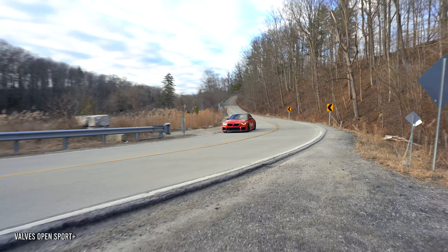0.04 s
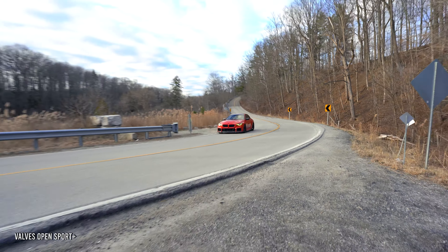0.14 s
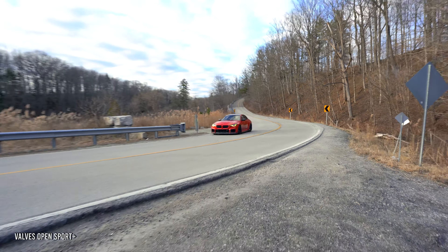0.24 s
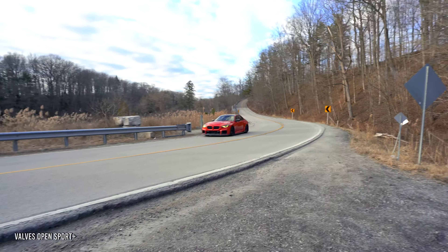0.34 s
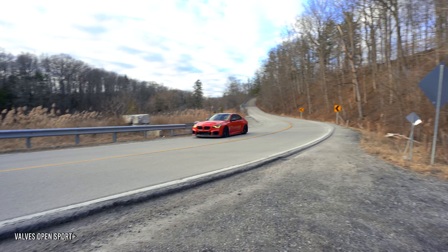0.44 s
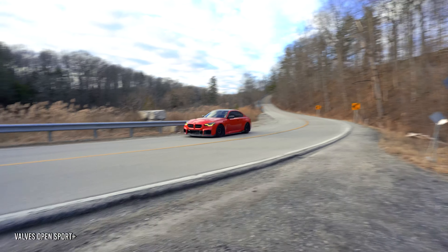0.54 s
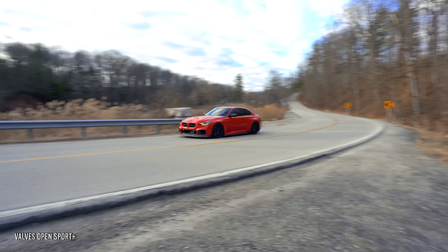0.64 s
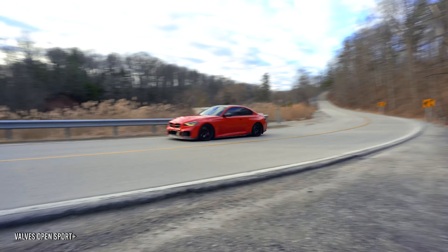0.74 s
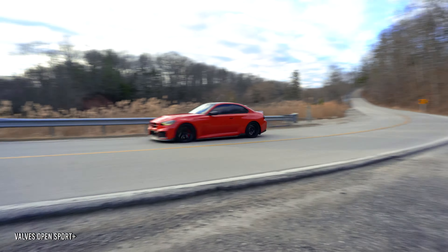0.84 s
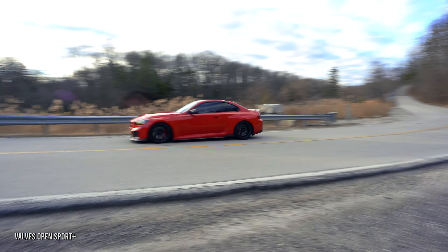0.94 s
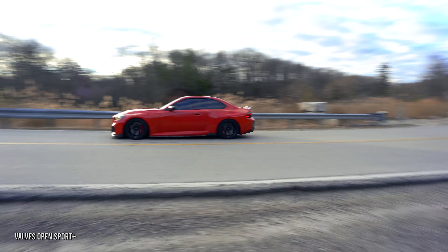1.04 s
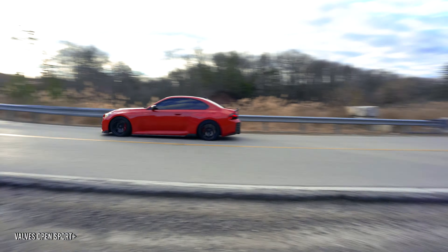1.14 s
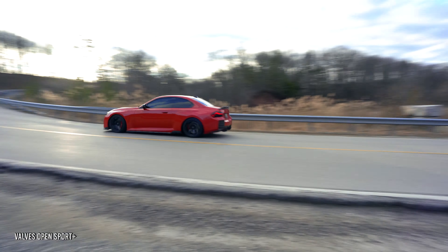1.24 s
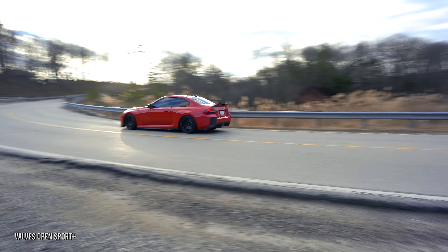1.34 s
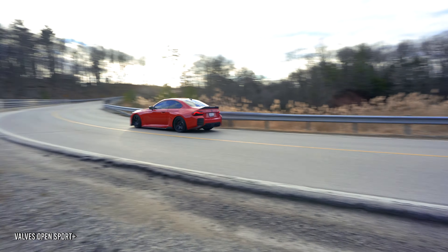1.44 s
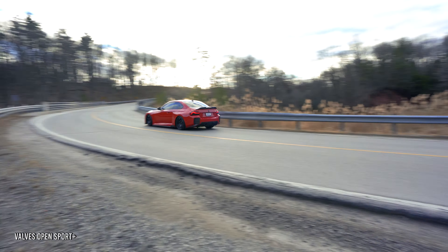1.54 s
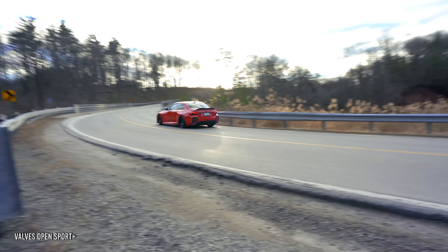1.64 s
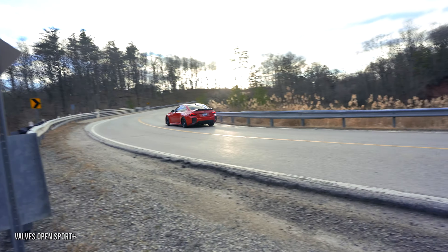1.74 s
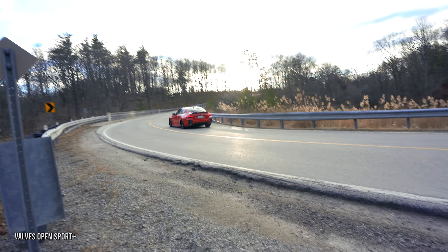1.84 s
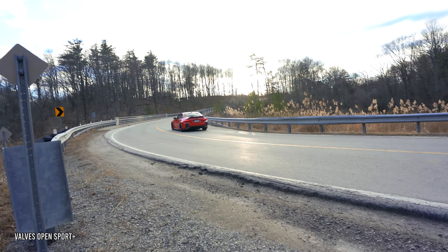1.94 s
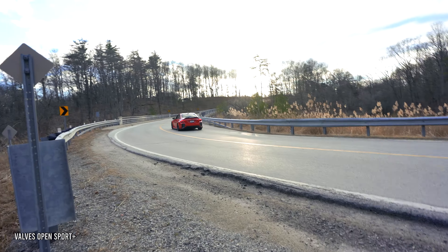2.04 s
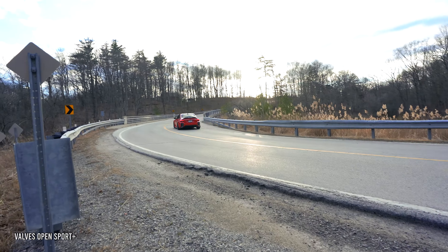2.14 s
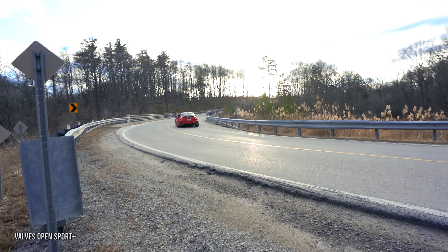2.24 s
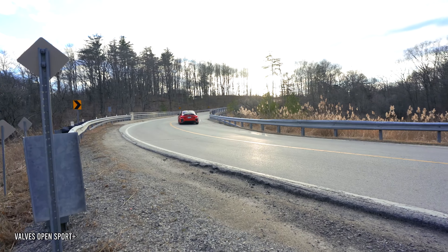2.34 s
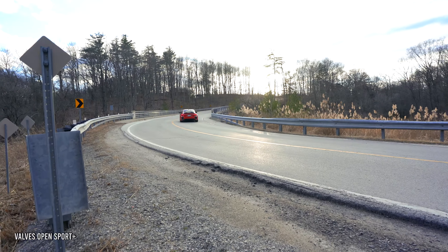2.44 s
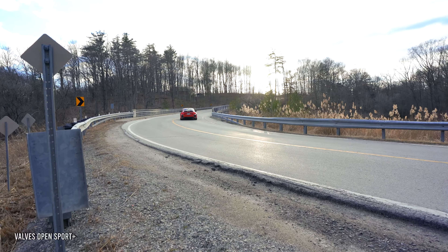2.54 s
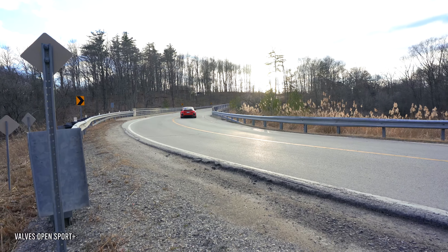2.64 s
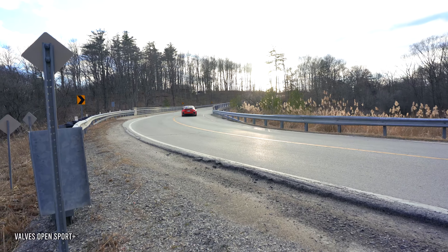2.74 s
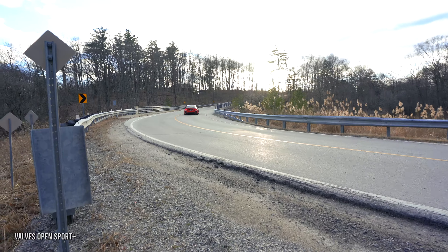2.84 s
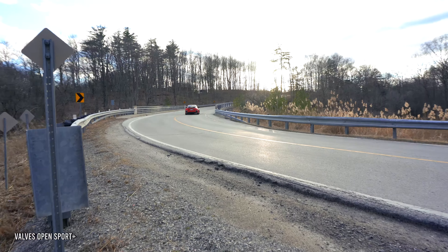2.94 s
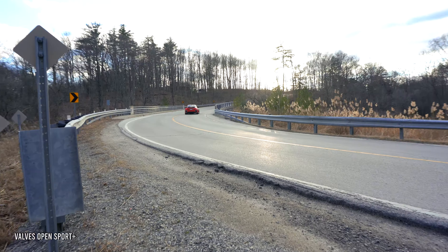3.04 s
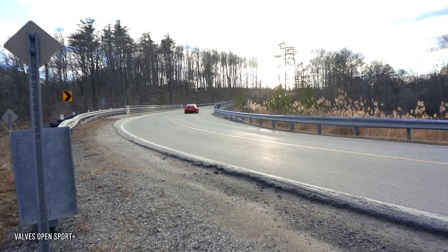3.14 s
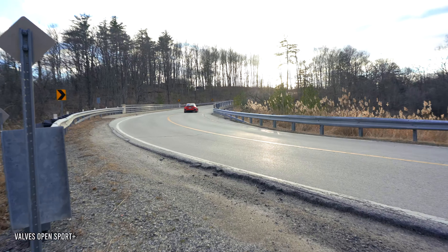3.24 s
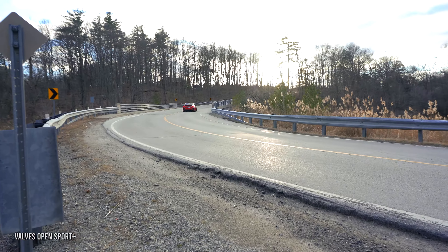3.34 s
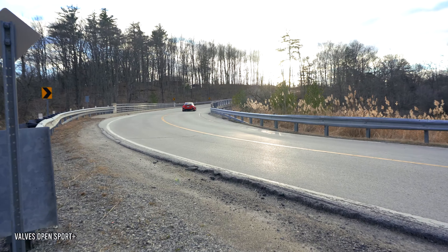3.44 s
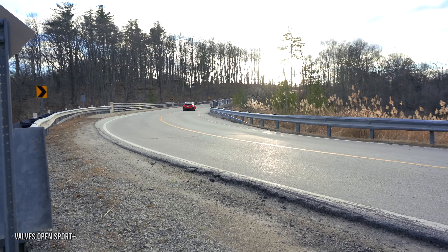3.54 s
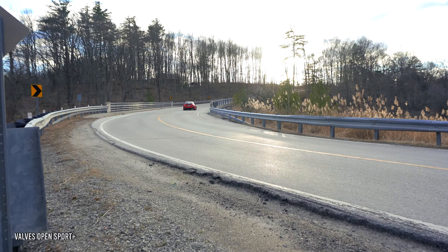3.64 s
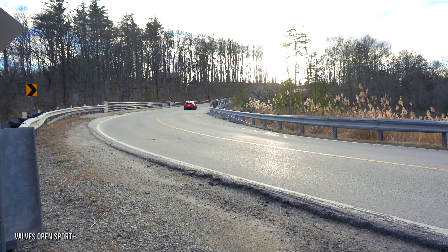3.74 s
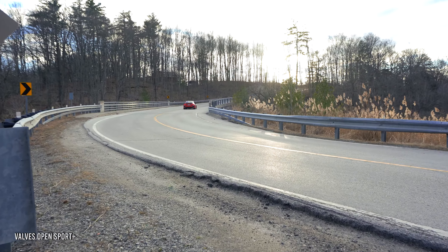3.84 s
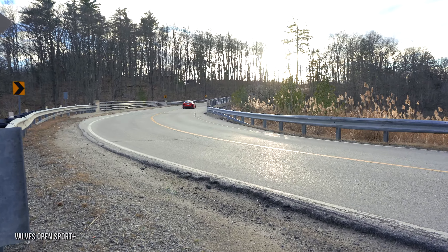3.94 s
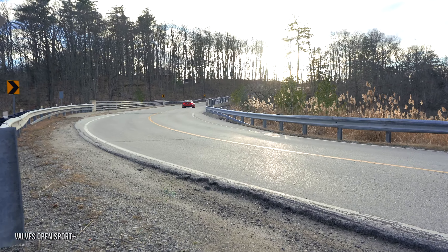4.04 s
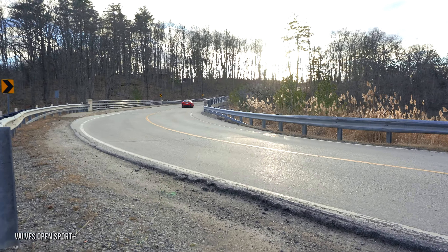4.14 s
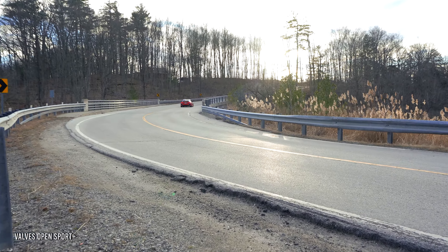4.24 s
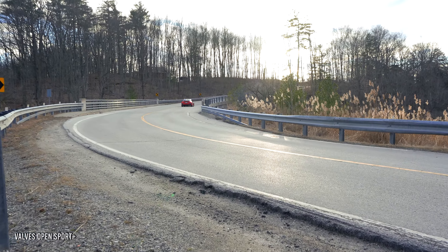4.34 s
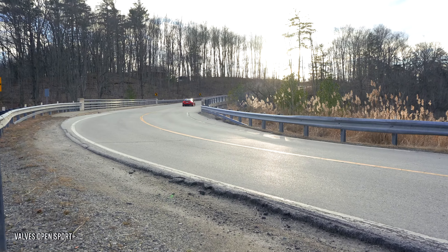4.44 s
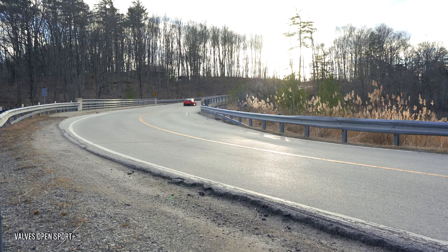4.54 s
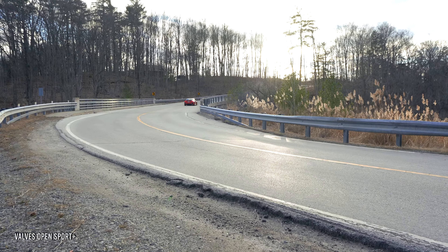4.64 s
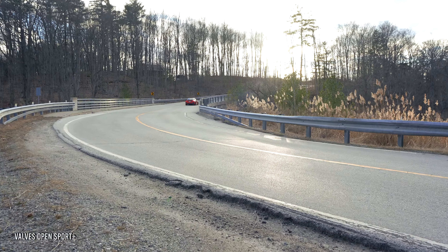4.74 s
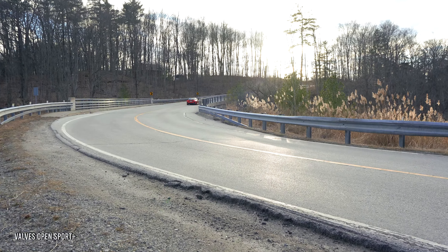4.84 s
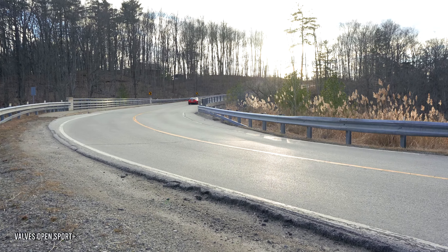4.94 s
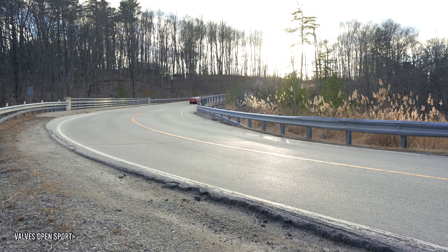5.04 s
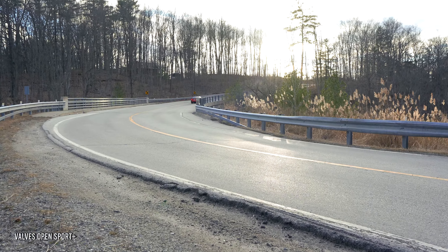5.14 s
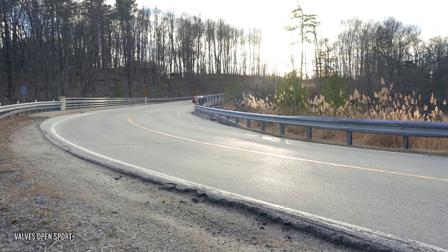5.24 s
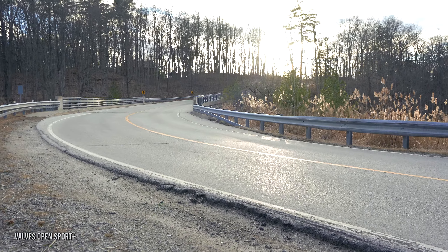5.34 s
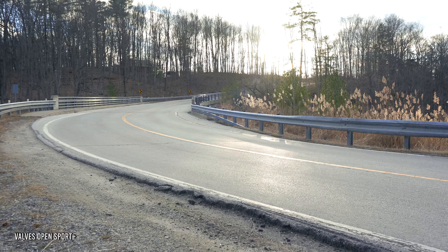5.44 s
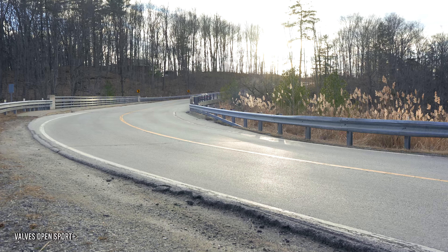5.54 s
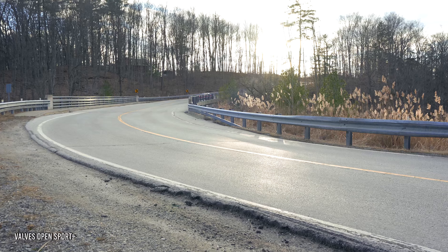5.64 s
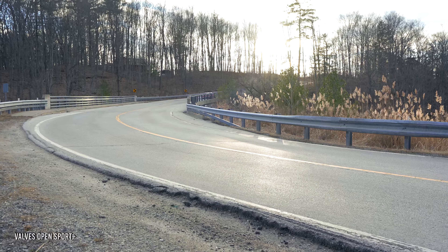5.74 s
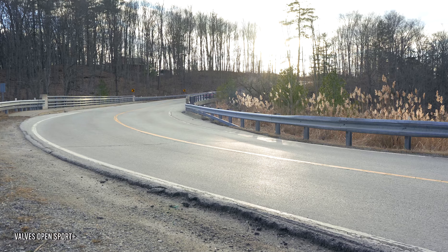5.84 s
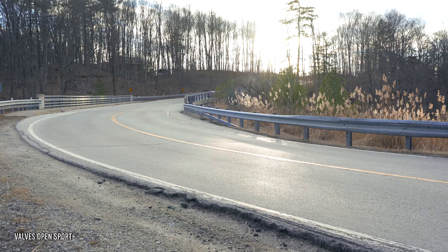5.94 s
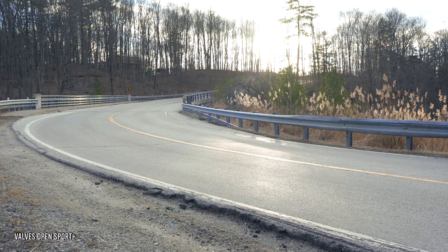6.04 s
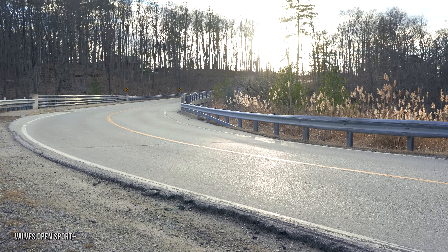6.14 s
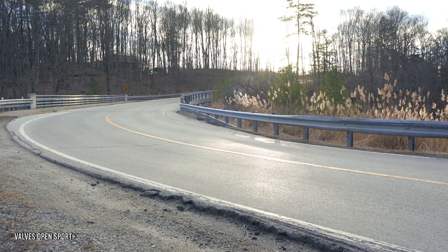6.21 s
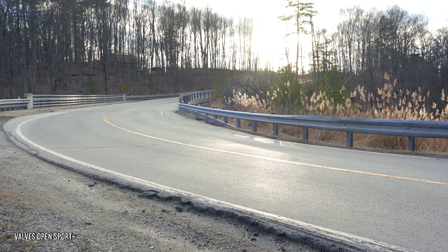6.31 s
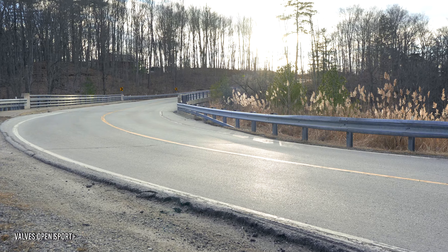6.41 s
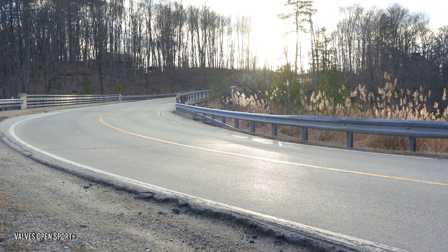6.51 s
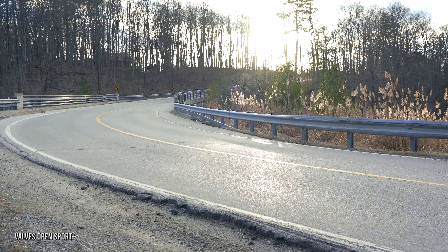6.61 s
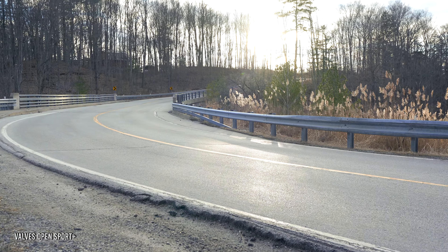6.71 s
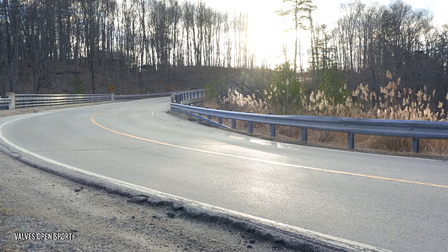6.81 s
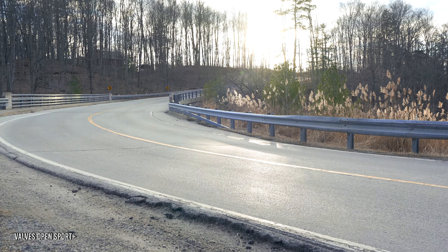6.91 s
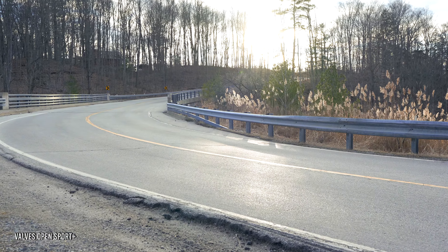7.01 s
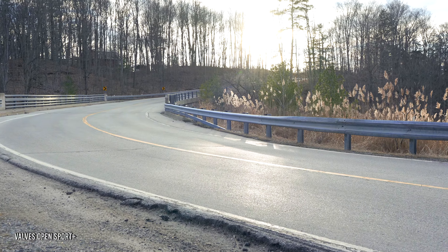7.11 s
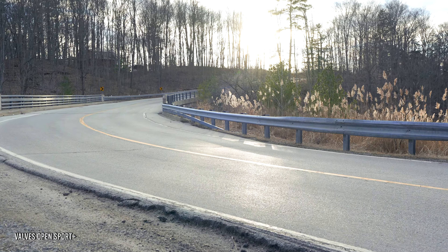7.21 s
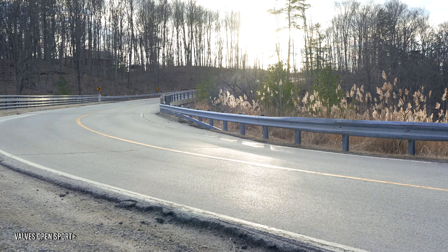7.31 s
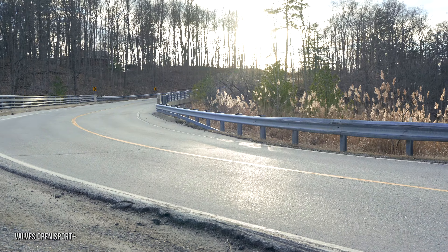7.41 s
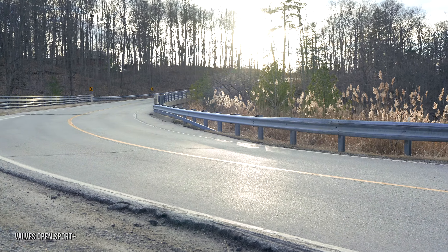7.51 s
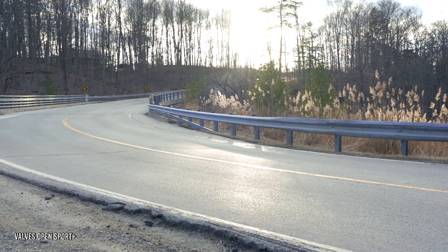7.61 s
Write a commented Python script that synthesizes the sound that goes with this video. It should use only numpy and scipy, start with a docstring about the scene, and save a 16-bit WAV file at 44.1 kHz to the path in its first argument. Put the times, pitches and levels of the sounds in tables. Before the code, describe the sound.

Loud sports car passes on a country road, falling in pitch, accelerating away with rasp, then lift-off pops and gunshot-like bangs echo off trees.

```python
"""A six-cylinder sports car sweeps past on a country road, shifts up and pulls away, exhaust valves open.
Its note is a stack of harmonics of the firing rate; filtered pulses and noise add the rasp of the gas.
When the driver lifts, unburnt fuel burbles (uneven pulses) and bangs (shock fronts with a ringing pipe).
Far off the car pulls once more and lifts again. Shaped noise makes tyre roar, wind and low puffs;
a sine of wavering pitch is the turbo's whistle, and a wooded slope answers as a decaying noise echo."""
import sys
import numpy as np
from scipy import signal
from scipy.fft import rfft, irfft, next_fast_len
from scipy.io import wavfile
from scipy.ndimage import uniform_filter1d, map_coordinates

SR = 44100
rng = np.random.default_rng(int(sys.argv[2]) if len(sys.argv) > 2 else 0)


def output_pcm(signal):
    """Save a mono or channel-first signal as 16-bit PCM at the path in sys.argv[1].

    Samples are clipped to [-1, 1] before scaling.
    """
    pcm = np.clip(np.atleast_2d(signal).T, -1, 1) * 32767
    wavfile.write(sys.argv[1], SR, np.round(pcm).astype(np.int16))


N = 338247

# the driver lifts off the throttle: start t/s, end t/s, flare just before/dB (below 0: a dip), note drop/dB,
# rasp drop/dB (below 0: a rise), burble level/dB, puff level/dB
LIFTS = [(1.55, 1.639, -1.5, 9.5, -1.5, -19, -15.5), (3.888, 5.47, 2.5, 12, 12, -19, -25),
         (7.107, 7.9, 10, 24.5, 13, -29, -31)]
# colour of low, buffeting air: f/Hz, relative level/dB
BUFFET = [(12, -6.5), (30, -2), (70, -1.5), (150, -4), (400, -16.5), (1500, -87)]
# the pass: moment of closest approach, distance then, speed
PASS_S, CLOSEST_M, SPEED_M_PER_S = 0.76, 15.6, 15.66
BEND_M = 57.6  # beyond this distance the car is round the bend and sounds duller


def amp(db):
    """Decibels to a plain factor."""
    return 10 ** (np.asarray(db) / 20)


def unit(x):
    """x scaled to an rms of 1."""
    return x / np.sqrt(np.mean(x ** 2) + 1e-20)


def along(points, hz):
    """Values read between (frequency, value) points on a log frequency axis."""
    f, v = np.transpose(points)
    return np.interp(np.log(hz + 1), np.log(f + 1), v)


def curve(points):
    """One value per sample, in straight lines between (time, value) points."""
    s, v = np.transpose(points)
    return np.interp(np.arange(N) / SR, s, v)


def wobble(rate):
    """A smooth random curve with this many random knots a second."""
    knots = rng.standard_normal(int(N * rate / SR) + 4)
    return map_coordinates(knots, [np.arange(N) * rate / SR])


def step(at_s, width_s):
    """A smooth rise from 0 to 1 around at_s."""
    return .5 + .5 * np.tanh((np.arange(N) / SR - at_s) / (2 * width_s))


def swell(at_s, width_s):
    """A bell of height 1 around at_s."""
    return np.exp(-((np.arange(N) / SR - at_s) / width_s) ** 2)


def coloured(x, spectrum, size=8192):
    """x through a filter of energy 1 with the given spectrum, which never sounds ahead of its input."""
    cepstrum = irfft(np.log(amp(along(spectrum, np.fft.rfftfreq(size, 1 / SR)))))
    # folding the second half onto the first makes the filter minimum phase
    cepstrum[1:size // 2] *= 2
    cepstrum[size // 2:] = 0
    response = irfft(np.exp(rfft(cepstrum)))
    return signal.fftconvolve(x, response / np.linalg.norm(response))[:len(x)]


def noise(spectrum):
    """Coloured noise of rms 1."""
    return unit(coloured(rng.standard_normal(N), spectrum))


def distance():
    """Metres from the car, on a straight line at steady speed, to the microphone."""
    return np.hypot(CLOSEST_M, SPEED_M_PER_S * (np.arange(N) / SR - PASS_S))


def beyond_bend():
    """Metres the car is beyond the bend, 0 before it."""
    return np.maximum(distance() - BEND_M, 0)


def wind(level_db=-1, lumps_db=3):
    """Lumps of air press on the microphone: low noise of uneven strength, with gusts."""
    # low air noise, strong at the pass, then calm, rising again at the end: t/s, relative level/dB
    air_levels = [(0, -24), (1.45, -23), (1.8, -31.5), (3, -40), (6.9, -42), (7.67, -30)]
    # gusts: t/s, half length/s, relative level/dB
    gusts = [(0.588, 0.038, -26), (6.06, .07, -33)]
    strength = amp(curve(air_levels)) + sum(amp(db) * swell(s, width) for s, width, db in gusts)
    return amp(level_db) * strength * unit(noise(BUFFET) * amp(lumps_db * wobble(8)))


def woods(x):
    """Trunks scatter the sound back as a noise tail that builds up, then fades; the treble dies first."""
    # how long the slope answers: f/Hz, time to fall by 60 dB/s
    decay = [(150, 1), (1000, 0.95), (4000, 0.64), (10000, 0.59)]
    hz, t, z = signal.stft(rng.standard_normal(SR), SR, nperseg=256)
    fade = amp(-60 * t / along(decay, hz)[:, None])
    build_up = 1 - np.exp(-t / 0.027)
    tail = signal.istft(z * fade * build_up, SR, nperseg=256)[1]
    return signal.fftconvolve(x, tail / np.linalg.norm(tail))[:N]


def tyres(near_db=-17.5, ground_loss_db_per_m=0.86, far_db=-61.5):
    """Tread roars on asphalt, loudest at the pass; distance and ground take it down to a faint hush."""
    # colour of the roar: f/Hz, relative level/dB
    road_colour = [(100,-5.5),(500,-4),(900,1),(1700,-1),(2300,-5.5),(3000,-6),(3950,-9.5),(4550,-24.5),(5050,-22),(5800,-26.5),(8300,-28.5),(10000,-34),(16000,-42.5)]
    r = distance()
    roar = amp(near_db - ground_loss_db_per_m * (r - CLOSEST_M)) * CLOSEST_M / r
    return np.hypot(roar, amp(far_db)) * amp(1.1 * wobble(12.5)) * noise(road_colour)


def turbo(pitch_hz=5060, level_db=-49, at_s=0.49, half_s=.4, waver=0.011):
    """A thin, unsteady whistle while the car faces the microphone: a sine with a wavering pitch."""
    phase = 2 * np.pi * np.cumsum(pitch_hz * (1 + waver * wobble(300))) / SR
    return amp(level_db) * swell(at_s, half_s) * np.sin(phase)


def chuffs(half_s=0.068):
    """A low puff of air leaves the pipes as the throttle shuts."""
    puffs = sum(amp(db) * swell(start + half_s / 2, half_s) for start, *_, db in LIFTS)
    return noise(BUFFET) * puffs


def firings(cycles):
    """The sample at which each cylinder fires."""
    return np.flatnonzero(np.diff(np.floor(cycles)) > 0)


def pulse_train(at, offset_s, strength):
    """Single-sample pulses at the firings, each shifted by its offset."""
    pulses = np.zeros(N)
    pulses[np.clip(at + np.round(offset_s * SR).astype(int), 0, N - 1)] = strength
    return pulses


def burble(cycles, spread_db=4, scatter_s=.0012, rumble=0.75):
    """With the throttle shut the charges burn at uneven moments and strengths, rumbling in the pipe."""
    # colour of the pipe: f/Hz, relative level/dB
    pipe = [(40,-35.5),(75,-12.5),(120,-5),(170,-12),(235,4),(280,-0.5),(340,2),(430,-10.5),(520,-10),(700,-9),(850,-17.5),(1100,-14.5),(1500,-28),(3900,-43),(4600,-55),(12000,-91)]
    at = firings(cycles)
    timing, strength = rng.standard_normal((2000, 2))[:len(at)].T
    pulses = pulse_train(at, scatter_s * timing, amp(spread_db * np.minimum(strength, 1)))
    flame = rumble * rng.standard_normal(N) * amp(3.2 * wobble(35))
    return unit(coloured(unit(pulses) + flame, pipe))


def pops(misfire, per_s=9, level_db=-5, boom_db=8.5, scatter_db=3):
    """Small pops at random moments in each lift, as (time, level, boom) rows that follow the burble's level."""
    rows = []
    for start, end, *_ in LIFTS:
        for slot in np.arange(start, end, 1 / per_s):
            s = slot + rng.random() / per_s
            chance_db = scatter_db * rng.normal()
            if s < min(end, N / SR):
                db = 20 * np.log10(misfire[int(s * SR)] + 1e-9) + chance_db
                rows.append((s, db + level_db, db + boom_db))
    return rows


def bangs(rows, blast_db=1, boom_db=-5, crack_db=-21, steepening=0.66, flame=0.15, flame_t60=0.048,
          dull_db_per_m=0.8):
    """A shock front with its echoes and a ragged spit of flame; the pipe rings on below."""
    # returns of the shock along the pipe and off the road and guard rail: typical delay/s, typical gain
    echoes = [(.003,0.14),(.006,0.23),(.009,0.51),(0.017,.16),(0.021,.12)]
    # colour of the main blast: f/Hz, relative level/dB
    blast_colour = [(100,-12.5),(400,6),(800,4),(1050,7),(1330,-2),(1700,2.5),(2400,-7.5),(3200,-6),(3950,-7.5),(4600,-31),(7000,-42.5),(15000,-70)]
    # colour of the sharp crack on top: f/Hz, relative level/dB
    crack_colour = [(2500, -33.5), (4500, -3), (6000, -5.5), (8500, -14), (11000, -19), (16000, -12.5)]
    # the tailpipe's ring: typical f/Hz, typical relative level/dB, time to fall by 60 dB/s
    ring_modes = [(80,-18.5,.09),(125,-24,.07),(236,-8,0.067),(336.2,13,0.07),(374,-11.5,0.039),(514,-0.5,0.096),(606,-6,0.065)]
    out, t = np.zeros(N + SR), np.arange(SR // 4) / SR
    beyond_m = beyond_bend()
    for s, db, low_db in rows:
        front = np.zeros(len(t))
        front[0] = 2
        front[round(abs(.0014 + .0003 * rng.normal()) * SR)] -= 1.4  # the suction after the front
        for delay, gain in echoes:
            front[round(delay * rng.uniform(.88, 1.12) * SR)] += 2 * gain * amp(2 * rng.normal())
        spit = flame * unit(rng.standard_normal(len(t)) ** 3) * amp(-60 * t / flame_t60)
        blast = coloured(front + spit, blast_colour)
        crack = coloured((front + spit) * amp(-60 * t / 0.19), crack_colour)
        ring = np.zeros(len(t))
        for hz, level, t60 in ring_modes:
            fading = amp(level + rng.normal(0, 1.6) - 60 * t / t60)
            ring += fading * np.sin(2 * np.pi * hz * (1 + 0.016 * rng.normal()) * t)
        # strong, near shocks have steeper fronts
        sharp = amp(crack_db + steepening * db - dull_db_per_m * beyond_m[int(s * SR)])
        bang = amp(db + blast_db) * (blast / abs(blast).max() + sharp * crack / abs(crack).max())
        boom = amp(low_db + boom_db) * ring / abs(ring).max()
        out[round(s * SR):][:len(t)] += bang + boom
    return out[:N]


def patchy(x, depth_db=2.07):
    """Random patches of the rasp's spectrum swell and sink slowly."""
    z = signal.stft(x, nperseg=1024)[2]
    field = uniform_filter1d(rng.standard_normal(z.shape), size=4, axis=0)
    field = uniform_filter1d(field, size=20, axis=1)
    return signal.istft(z * amp(depth_db * unit(field)), nperseg=1024)[1][:N]


def rasp(cycles, turbulence=0.81, depth=0.19, scatter_db=2.0, spit_db=1.5, edge=0.23):
    """Each cylinder's sharp pulse, with a puff of turbulent gas, through the pipes."""
    # colour of the rasp's body: f/Hz, relative level/dB
    body_colour = [(60,-26.5),(170,-1),(280,9.5),(450,1.5),(700,3.5),(900,-1.5),(1150,3),(1480,-9.5),(1750,-5.5),(2400,-16.5),(3900,-21),(4600,-52),(12000,-82.5)]
    # colour of its treble: f/Hz, relative level/dB
    sizzle_colour = [(500,-27),(1400,4.5),(1750,3.5),(2400,-0.5),(3100,-0.5),(3700,0.5),(4050,-6),(4600,-20),(5100,-19),(6200,-24),(8800,-29),(11000,-41.5),(16000,-53.5)]
    # treble against the body: t/s, level/dB
    treble = [(0, -3), (.3, -3.5), (.9, -3.5), (1.5, -22.5), (1.7, -3.5), (2.1, -14.5), (2.45, -14.5),
              (2.6, -6.5), (3.3, -9.5), (3.8, -13), (4.2, -8), (5.7, -12.5), (6.3, -20), (7.67, -21)]
    at = firings(cycles)
    cylinder = np.arange(len(at)) % 6
    strength_db = np.array([3.0, -7, -0.5, 5, 0.0, 2])[cylinder]
    lag_s = np.array([0, 0.0042, -0.0042, .0004, -.0002, 0.0045])[cylinder]  # unequal runners
    scatter = scatter_db * rng.standard_normal(len(at))
    pulses = pulse_train(at, lag_s, amp(strength_db + scatter))
    gate = (1 + depth * np.cos(2 * np.pi * cycles)) * amp(spit_db * wobble(110))
    puffs = unit(rng.standard_normal((2, N)) * gate)
    body = unit(coloured(0.6 * unit(pulses) + turbulence * puffs[0], body_colour))
    sizzle = unit(coloured(edge * unit(pulses) + puffs[1], sizzle_colour))
    return body + sizzle * amp(curve(treble))


def throttle(shut_time_s=0.014, flare_lead_s=.075, flare_s=.055, flare_rasp_share=0.42, stumble_db=4,
             burble_fade_db_per_s=2.5):
    """Each lift: a brief flare or dip, then the note drops, the rasp changes and a fading burble takes over."""
    # level shared by note and rasp, rising at the end: t/s, relative level/dB
    exhaust = [(0, -11), (.6, -10.5), (1.05, -12.5), (1.5, -11.5), (1.8, -14.5), (2.3, -11.5),
               (3.75, -12.5), (5.05, -17), (5.5, -27.5), (5.88, -30), (6.2, -23.5), (6.62, -25),
               (6.73, -26), (6.84, -21.5), (7.05, -22), (7.67, -15)]
    t = np.arange(N) / SR
    note_db = rasp_db = curve(exhaust)
    flare_db = misfire = np.zeros(N)
    for start, end, flare, note_drop, rasp_drop, burble_db, _ in LIFTS:
        shut = step(start, shut_time_s) * (1 - step(end, shut_time_s))
        # the note is unsteady with the throttle shut
        note_db = note_db - (note_drop + stumble_db * wobble(16)) * shut
        rasp_db = rasp_db - rasp_drop * shut
        flare_db = flare_db + flare * swell(start - flare_lead_s, flare_s)
        misfire = misfire + shut * amp(burble_db - burble_fade_db_per_s * np.maximum(t - start, 0))
    return note_db, rasp_db + flare_rasp_share * flare_db, flare_db, misfire


def harmonics(rate_hz, note_db, flare_db, count=6, flare_tilt=0.87, waver_db=.35, waver_db_per_m=0.0329):
    """Level of each harmonic as it slides through the pipes' resonances, leaves the car's shadow and dulls."""
    # the pipes' effect on the note: f/Hz, relative level/dB
    note_colour = [(100, -16.5), (120, -20.5), (198, 0.5), (240, 0), (296, -11), (312, -2.5), (335, -1),
                   (360, -0.5), (400, -3.5), (420, -8), (442, -12.5), (470, -27.5), (500, -15), (550, -9),
                   (595, -10.5), (630, -25.5), (720, -24.5)]
    # reflections weaken or strengthen one harmonic for a moment: t/s, half length/s, f/Hz, gain/dB
    reflections = [(0.56, 0.095, 360, -8.5), (1.117, 0.21, 440, 9), (1.209, 0.16, 215, -9),
                   (1.3, 0.39, 320, 1.5), (5.068, 0.13, 337, 5), (6.387, .045, 344.8, -17.5),
                   (6.585, 0.1, 351, 8.5), (6.643, 0.1, 236, -3), (6.914, 0.058, 367, -12),
                   (7.063, 0.041, 345, 4.5), (7.05, 0.058, 699.4, 15)]
    fade_width_hz = 31
    # coming on, the car hides its tailpipes; the lower harmonics bend round it first
    shadow_db, emerge_s, emerge_s_per_octave, emerge_width_s = 16, 0.49, 0.57, 0.13
    # the fundamental booms until the tail turns to the microphone
    boom_db, turn_s, turn_width_s = 12.5, 1.58, 0.044
    dull_db_per_m_octave = .15  # beyond the bend the upper harmonics are screened off
    levels_db, beyond_m = [], beyond_bend()
    fades = [(hz, db * swell(s, width)) for s, width, hz, db in reflections]
    for k in range(1, count + 1):
        octaves = np.log2(k / 2)  # counted from the second harmonic
        if k == 1:
            aspect_db = boom_db * (1 - step(turn_s, turn_width_s))
        else:
            out_of_shadow = step(emerge_s + emerge_s_per_octave * octaves, emerge_width_s)
            aspect_db = -shadow_db * (1 - out_of_shadow)
        tilt_db = octaves * (flare_tilt * flare_db - dull_db_per_m_octave * beyond_m)
        fade_db = sum(db * np.exp(-((k * rate_hz - hz) / fade_width_hz) ** 2) for hz, db in fades)
        unsteady_db = (waver_db + waver_db_per_m * beyond_m) * wobble(5)
        pipe_db = along(note_colour, k * rate_hz)
        levels_db.append(note_db + pipe_db + aspect_db + tilt_db + fade_db + unsteady_db)
    return levels_db


def drone(cycles, levels_db, uneven=0.078, bank=0.015, flutter=0.0058, drift=.04):
    """Harmonics of the firing rate, rougher as they go up; unequal cylinders add crank and cam sidebands."""
    out = np.zeros(N)
    for k, level_db in enumerate(levels_db, 1):
        phase = 2 * np.pi * (k * cycles + rng.random()) + drift * k * wobble(25)
        roughness = 1 + flutter * k ** 1.2 * wobble(70)
        out += amp(level_db) * np.sqrt(2) * np.sin(phase) * roughness
    crank = 2 * np.pi * cycles / 3  # three firings to a turn of the crank
    return out * (1 + uneven * np.sin(crank) + bank * np.sin(crank / 2))


def scene():
    """One firing rate and one throttle drive note, rasp and crackle; the slope answers over tyres and wind."""
    # the engine's pitch as it reaches the microphone: t/s, firing rate f/Hz
    firing = [(0, 127.6), (.25, 122.8), (.72, 117.9), (1.5, 102.3), (1.85, 100.1), (2.18, 99.6),
              (2.3, 103.7), (2.5, 104.5), (2.85, 109), (3.1, 111.6), (3.18, 114.2), (3.4, 115.6),
              (3.75, 121.2), (3.87, 114.4), (4.3, 116.3), (5, 111.6), (5.5, 106), (6.3, 113.5),
              (6.9, 122.6), (7.1, 114.5)]
    # bangs in the pipes: t/s, relative level/dB, relative boom level/dB
    bang_rows = [(1.549, -12.5, 4.5), (3.954, -8, -6), (4.091, -13, -1.5), (4.104, 0.5, 3.5),
                 (4.217, -4.5, 0), (4.263, 0, 5), (4.372, 1, -3), (4.381, -6, 1.5), (4.394, 2.5, -3),
                 (4.524, 0.5, -6), (4.538, -6.5, 4.5), (4.643, -0.5, -1.5), (4.652, -3.5, -16.5),
                 (4.675, -7.5, 4.5), (4.82, 2, 1), (4.83, -3.5, -12), (4.899, -1, -1), (4.973, -10, -10),
                 (4.982, -2, -5.5), (5.014, -13.5, -0.5), (5.06, -6, -2.5), (5.26, -8.5, -9),
                 (5.266, -9, -9), (5.273, -1.5, -15.5), (5.308, -18.5, -7), (5.408, -16, -4.5),
                 (7.409, -38, -32), (7.436, -31, -10.5), (7.454, -19, -28), (7.469, -18, -16.5),
                 (7.61, -23.5, -16), (7.632, -15.5, -14.5), (7.652, -17.5, -21)]
    rate_hz = curve(firing)
    cycles = np.cumsum(rate_hz) / SR
    note_db, rasp_db, flare_db, misfire = throttle()
    air = tyres() + wind() + chuffs() + turbo()
    crackle = misfire * burble(cycles) + bangs(list(bang_rows) + pops(misfire))
    gas = amp(rasp_db - 11.5) * patchy(rasp(cycles))
    note = drone(cycles, harmonics(rate_hz, note_db, flare_db))
    # the slope's share of the crackle grows with distance
    crackle_to_woods = amp(-29.5 + 0.1761 * distance()) * crackle
    answer = woods(crackle_to_woods + amp(-7.0) * gas + amp(-19.5) * note)
    return (note + gas + crackle + answer + air)[None]


def record(dry, top_hz=15900):
    """The loudest peaks are rounded off near full scale; then nothing is kept above the band limit."""
    clipped = dry / (1 + np.abs(dry) ** 8) ** (1 / 8)
    m = next_fast_len(N + SR // 2)
    return irfft(rfft(clipped, m) * (np.fft.rfftfreq(m, 1 / SR) < top_hz), m)[..., :N]


dry = scene()
out = record(dry)
output_pcm(out)
```